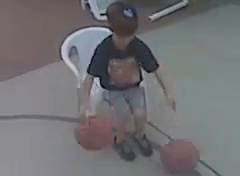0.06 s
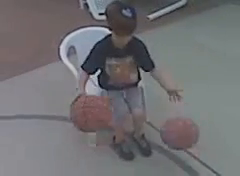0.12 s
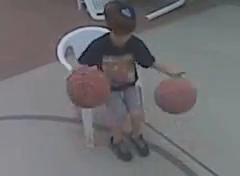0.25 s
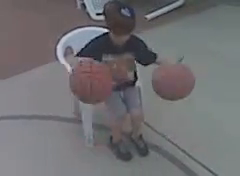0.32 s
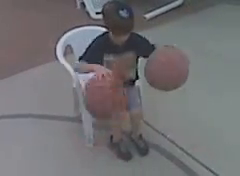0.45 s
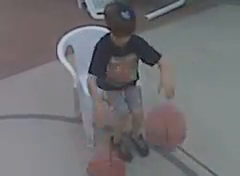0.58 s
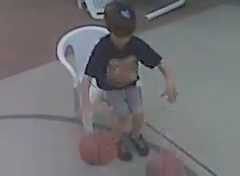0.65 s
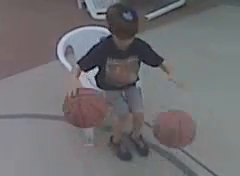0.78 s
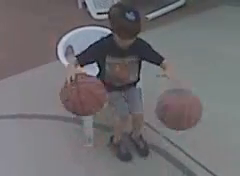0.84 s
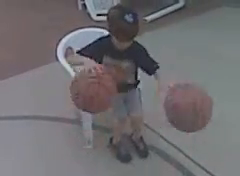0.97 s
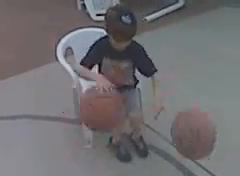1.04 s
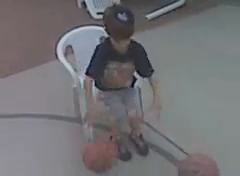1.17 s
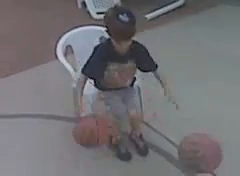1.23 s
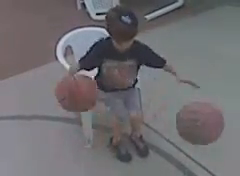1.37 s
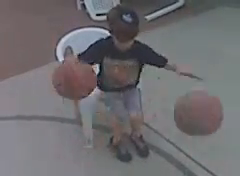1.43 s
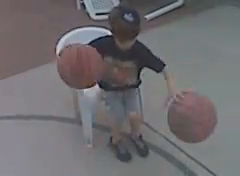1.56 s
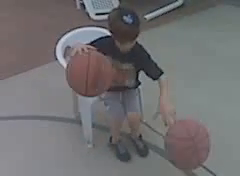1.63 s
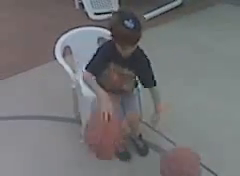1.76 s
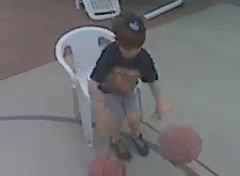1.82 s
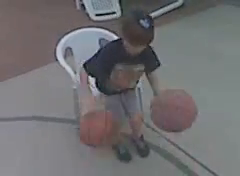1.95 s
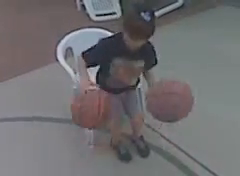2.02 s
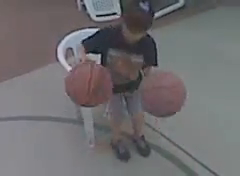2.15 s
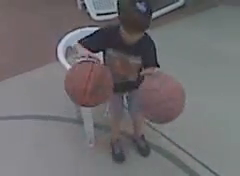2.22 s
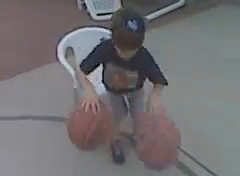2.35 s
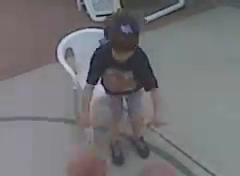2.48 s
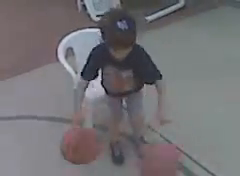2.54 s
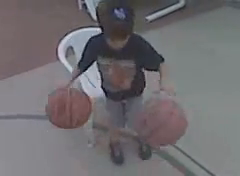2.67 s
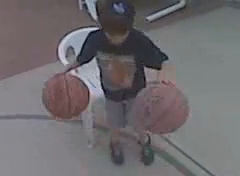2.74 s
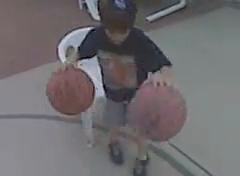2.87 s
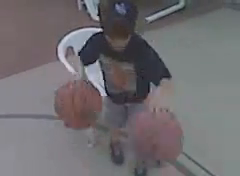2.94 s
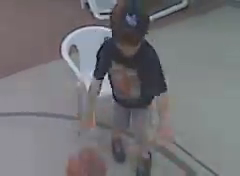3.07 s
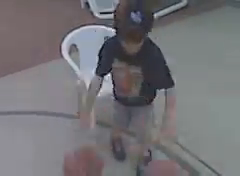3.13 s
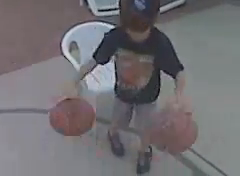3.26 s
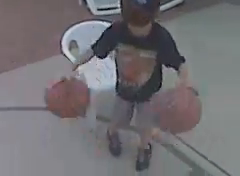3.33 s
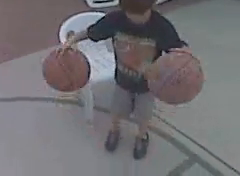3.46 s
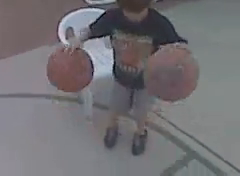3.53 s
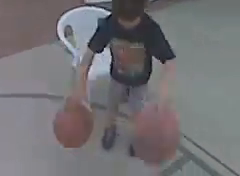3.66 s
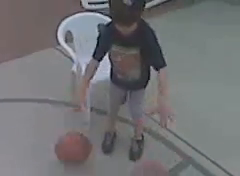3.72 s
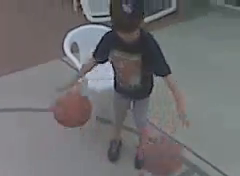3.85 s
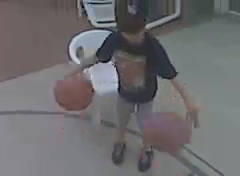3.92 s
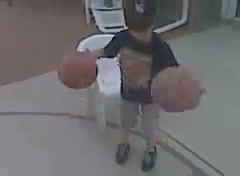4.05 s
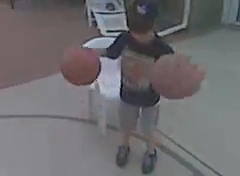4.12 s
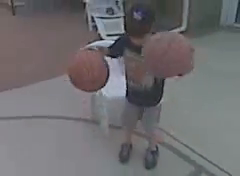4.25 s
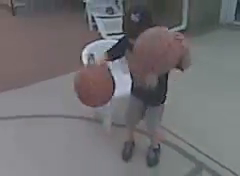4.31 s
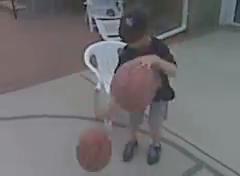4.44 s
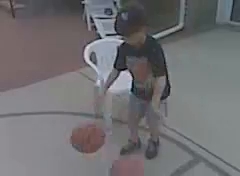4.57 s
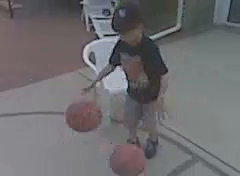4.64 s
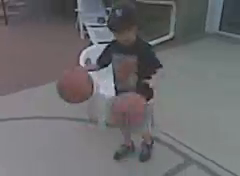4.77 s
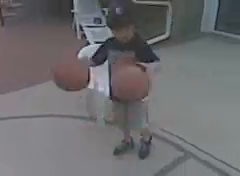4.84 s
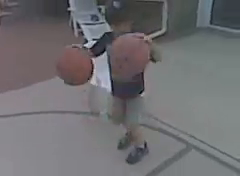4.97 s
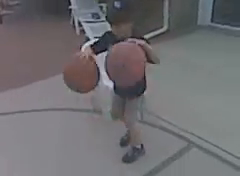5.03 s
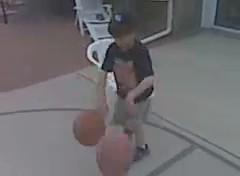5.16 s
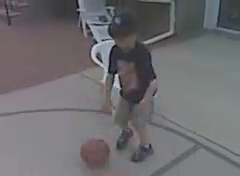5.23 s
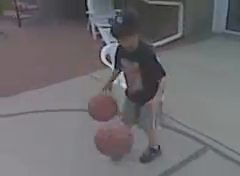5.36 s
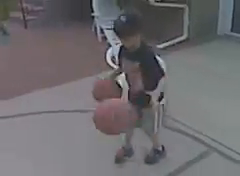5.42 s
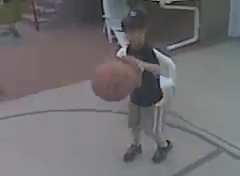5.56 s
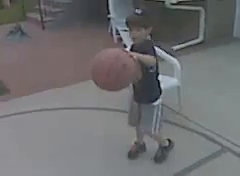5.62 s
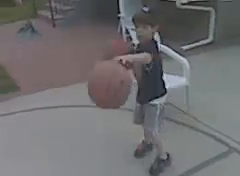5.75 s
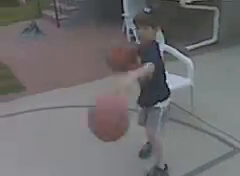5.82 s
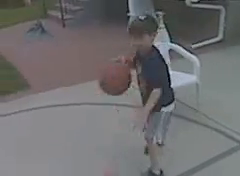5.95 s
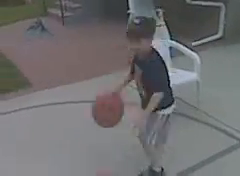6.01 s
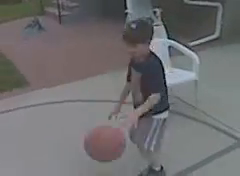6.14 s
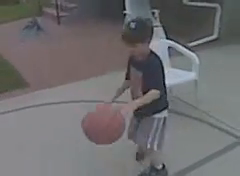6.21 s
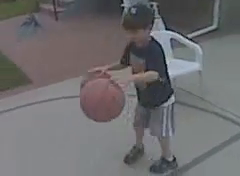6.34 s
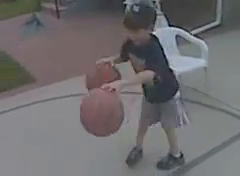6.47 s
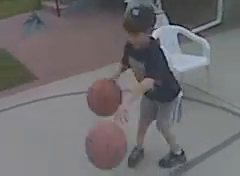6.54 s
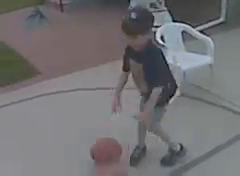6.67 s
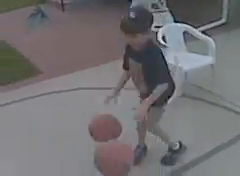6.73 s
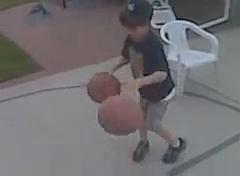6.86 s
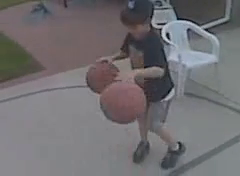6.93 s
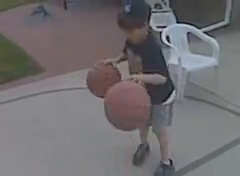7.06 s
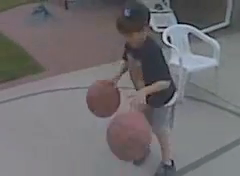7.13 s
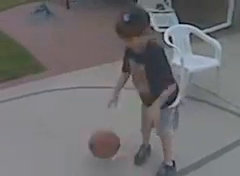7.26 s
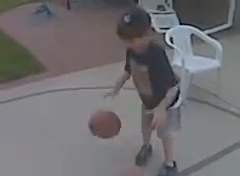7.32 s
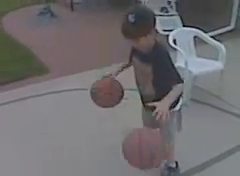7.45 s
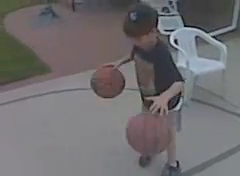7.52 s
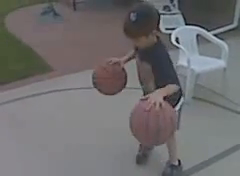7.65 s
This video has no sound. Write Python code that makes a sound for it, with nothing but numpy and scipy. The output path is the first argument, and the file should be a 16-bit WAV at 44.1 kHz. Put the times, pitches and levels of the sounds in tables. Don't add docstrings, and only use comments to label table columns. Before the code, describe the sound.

A steady pair of bouncing rubber balls smacks a hard yard floor, the two hits tightly bunched or slightly split. Later the gaps widen to about 0.7 seconds and shoes scrape and hands pat more noticeably before the rhythm settles again. Walls throw back clattery echoes; small birds whistle far off in soft outdoor hiss. Boxy, low-fidelity mono sound with clipped peaks and no high treble.

```python
import sys
import numpy as np
from scipy import signal
from scipy.fft import rfft, irfft, next_fast_len
from scipy.io import wavfile
from scipy.ndimage import uniform_filter1d

SR = 44100
rng = np.random.default_rng(int(sys.argv[2]) if len(sys.argv) > 2 else 0)


def int16_out(signal):
    q = np.round(np.clip(np.atleast_2d(signal).T, -1, 1) * 32767)
    wavfile.write(sys.argv[1], SR, q.astype(np.int16))


def boost_factor(decibels):
    exponent = np.asarray(decibels, float) / 20
    return 10 ** exponent


N = 339129
LEAD = 0.004

# f/Hz, level/dB per Hz
SLAP_COLOUR = [(100, -28.5), (300, -19.5), (750, -16.5), (1200, -0.5), (2100, -5.5), (2400, -18.5),
               (2800, -9.5), (3400, -7.5), (3900, -1), (4700, -6), (5600, -61.5)]
# f/Hz, level/dB per Hz
GRIT_COLOUR = [(100, -42.5), (300, -24.5), (1000, -13.5), (1800, -4.5), (2700, 0), (4700, -9.5),
               (5600, -60.5)]


def read(points, hz):
    f, value = np.transpose(points)
    return np.interp(np.log(hz + 1), np.log(f + 1), value)


def evened(x):
    return x / np.sqrt(np.mean(x ** 2) + 1e-20)


def smooth(x, size):
    return uniform_filter1d(uniform_filter1d(x, size=size), size=size)


def drifting_patches(x, bands, frames):
    return evened(uniform_filter1d(uniform_filter1d(x, size=bands, axis=0), size=frames, axis=1))


def add(mix, s, sound):
    part = mix[max(round(s * SR), 0):][:len(sound)]
    part += sound[:len(part)]


def colour(x, points):
    size = next_fast_len(len(x) + 2048)
    response = boost_factor(read(points, np.fft.rfftfreq(size, 1 / SR)))
    return irfft(rfft(x, size) * response, size)[:len(x)]


def ring(x, hz, width_hz):
    r = np.exp(-np.pi * width_hz / SR)
    pole = r * np.exp(2j * np.pi * hz / SR)
    return 2 * signal.lfilter([(1 - r) ** 2], [1, -2 * pole, pole ** 2], x).real


def hiss():
    # f/Hz, level/dB per Hz
    air_colour = [(18, -71), (30, -44), (80, -14.5), (151, -4.5), (203, -21.5), (243, -5), (441, -4),
                  (572, -8), (631, -4), (755, -5), (2930, 0), (3500, -5.5), (4550, -33), (7700, -120)]
    frames, hz = N // 128 + 6, np.fft.rfftfreq(512, 1 / SR)
    a, b, patches = rng.standard_normal((frames, 257, 3)).T
    patches = drifting_patches(patches, 5, 24)
    swell = evened(smooth(rng.standard_normal(frames), 100))
    level_db = read(air_colour[:-2], hz)[:, None] + 2.7 * patches + 1.27 * swell
    z = (a + 1j * b) * boost_factor(level_db) * (hz < 6000)[:, None]
    wash = signal.istft(z, nperseg=512, noverlap=384)[1][:N]
    return boost_factor(-44) * evened(wash)


def slap(db, hz, rise_ms, ring_ms, width_hz, plain, body, tint, crack):
    # f/Hz, width/Hz, level/dB
    air_modes = [(514, 210, -4), (926, 140, -10.5), (1400, 430, 5.5), (2080, 57, 1), (2630, 820, 3.5),
                 (3250, 500, -6.5)]
    t = np.arange(1800) / SR - LEAD
    shape = np.where(t < 0, np.exp(t * 1e3 / rise_ms), boost_factor(-60e3 * t / ring_ms))
    puff = rng.standard_normal(len(t)) * shape
    puff = puff + crack * rng.choice([-1, 1]) * (np.arange(len(t)) == np.argmin(abs(t)))
    modes = np.zeros(len(t))
    for f, width, mode_db in air_modes:
        gain = boost_factor(mode_db + 10.0 * rng.standard_normal())
        modes += gain * ring(puff, f * rng.uniform(0.94, 1.05), 1.6 * width)
    smack = plain * evened(colour(puff, tint))
    sound = smack + evened(ring(puff, hz, width_hz)) + body * evened(modes)
    return boost_factor(db) * sound / abs(sound).max()


def yard(db, tint):
    # f/Hz, t60/s
    decay_times = [(100, 0.45), (300, .38), (800, 0.25), (2000, 0.42), (3500, 0.48)]
    count = SR * 3 // 5
    clumps_db = 2.0 * evened(uniform_filter1d(rng.standard_normal(count), size=90))
    taps = rng.standard_normal(count) * boost_factor(clumps_db)
    sharp = rng.random(count) < 150 / SR
    taps = taps + 7.6 * rng.standard_normal(count) * sharp
    hz, t, z = signal.stft(taps, SR, nperseg=512)
    patches = drifting_patches(rng.standard_normal(z.shape), 3, 6)
    z = z * boost_factor(read(tint, hz)[:, None] + 3.9 * patches)
    quick = boost_factor(-60 * t / read(decay_times, hz)[:, None])
    faint = boost_factor(-24.0 - 60 * t / 0.9)
    tail = signal.istft(z * (quick + faint), SR, nperseg=512)[1][:count]
    fade_in = np.minimum(np.arange(count) / SR / 0.0054, 1)
    return boost_factor(db) * tail / tail[:2000].std() * fade_in


def walls(hz, house_ms, house_db, fence_db, far_db):
    fence_hz, edge_hz, edge_db, far_ms = 2150, 2650, -8, 56.2
    return [(20.6, fence_db, fence_hz),
            (house_ms - 4.0, house_db + edge_db, edge_hz),
            (house_ms, house_db, np.sqrt(hz * fence_hz)),
            (house_ms + 3.6, house_db + edge_db, hz),
            (far_ms, far_db, 2230),
            (far_ms + house_ms, far_db - 10, edge_hz)]


def bounces():
    # t/s, slap peak level/dB, slap colour f/Hz, near echo level/dB, yard level/dB (both against the slap)
    landings = [(0.0365, -10.5, 1630, 6, 6), (0.1209, -7.5, 2590, -7.5, -2), (0.6592, -6, 2020, 3.5, 4.5),
                (0.7272, -2.5, 1740, 7.5, 0.5), (1.2188, -2.5, 1880, -5.5, -0.5),
                (1.225, 4.5, 2300, 1.9, -5), (1.79, -13.5, 2050, -9, 9), (1.9026, -6, 1830, -2, 4.5),
                (2.5203, -3, 2080, 5, -6.5), (2.5269, 1.5, 2270, 5, -2), (3.155, -3, 1300, 4.5, 4.5),
                (3.1677, -2, 2340, 3, -4), (3.7802, -7, 2020, 1.5, 3), (3.8209, -2.5, 1444, 1.5, 1.5),
                (4.564, -3.5, 2490, 1, 2.5), (4.6648, -6.5, 3620, 4, 7), (5.2947, 0.35, 3270, -2, 0.5),
                (6.056, -13.5, 1960, 7, 6.5), (6.1694, -5.5, 1700, 2, 6), (6.7117, -10.5, 3250, 0.5, 8),
                (6.7304, -5.5, 2150, 0, 3.5), (7.3071, -9.5, 3100, 8.5, 3), (7.3326, -4.5, 2720, -2.5, 1.5)]
    # way to the house wall and back t/ms, then house, side fence, far wall level/dB against the slap
    places = [(32.2, 3, -3, -7.5), (30, -1.5, -7, -10.5), (30.3, 1.5, 3, -10), (34.3, -1, -9.5, -6),
              (27.55, -5, -3.5, -8.5), (33.5, -10.5, -16, -18.5), (33, -7.5, 4.5, -1.5),
              (32.8, 2.5, -3.3, -6), (32.2, -2.5, -16.5, -13.5), (34.6, -14, -6, -17.5),
              (32.2, -4.5, -16, -12), (34.7, -7, -6.5, -10.5), (27.6, 3.5, -4, -10.5), (35, -6, -12.5, -10),
              (30, 0.5, -31, -1.5), (32, -3.2, -18, -4.5), (30, -5, -16, -17.5), (28.4, 6.5, -11, 1),
              (29.06, 4.5, -12, -7.5), (27.5, 3, -12, -13.5), (28.4, 1.8, -15, -12.5),
              (33.4, 3.3, -20.5, -10.5), (36.4, -7, -15, -13)]
    # delay t/ms, level/dB
    near_surfaces = [
        (4.5, -6),
        (9.5, -7.5),
        (14, -14.5),
    ]
    # f/Hz, level/dB per Hz
    yard_colour = [(40, -17), (150, -16.5), (270, -11.5), (700, -7), (1300, -3), (2100, -4), (2400, -5),
                   (2800, -3), (3400, -10.5), (4500, -11.5)]
    out = np.zeros(N)
    for (s, db, hz, echo_db, yard_db), place in zip(landings, places):
        start = s - LEAD
        touch = slap(db - 19, hz, 0.3, 26, 706, 0.8, 0.37, SLAP_COLOUR, 2.0)
        add(out, start - 0.0015, touch)
        main = slap(db + 1.0, hz, 0.5, 17.2, 550, 0.8, 1.0, SLAP_COLOUR, 3.0)
        add(out, start + 0.0008, main)
        for ms, near_db in near_surfaces:
            near_hz = hz * rng.uniform(0.88, 0.98)
            echo = slap(db + near_db + echo_db, near_hz, 0.9, 22, 500, 1.0, 1.0, SLAP_COLOUR, 11.5)
            add(out, start + ms / 1e3, echo)
        add(out, s, yard(db + yard_db - 15.5, yard_colour))
        for ms, wall_db, wall_hz in walls(hz, *place):
            echo = slap(db + wall_db, wall_hz, 0.5, 10.5, 650, 0.56, 0.45, SLAP_COLOUR, 8.0)
            add(out, start + ms / 1e3, echo)
    return out


def thump(db, hz, t60, swell_ms):
    t = np.arange(SR // 8) / SR
    shape = (1 - np.exp(-t * 1e3 / swell_ms)) ** 2 * boost_factor(-60 * t / t60)
    return boost_factor(db) * shape / shape.max() * np.sin(2 * np.pi * (hz * t + rng.random()))


def hum(db, hz, width_hz, t60):
    t = np.arange(SR // 2) / SR
    tone = evened(ring(rng.standard_normal(len(t)), hz, width_hz))
    return boost_factor(db - 60 * t / t60) * tone * np.minimum(t / 0.0087, 1)


def thumps():
    # t/s, peak level/dB, f/Hz, lingering hum
    # level/dB against the thump
    rebounds = [(0.038, -25, 282, -20), (0.127, -22.5, 257, -13.5), (0.656, -19.5, 273, -17.5),
                (0.728, -13.5, 247, -18), (1.219, -14.5, 338, -21.5), (1.228, -16, 242, -17),
                (1.796, -30, 279, -21), (1.903, -18.5, 287, -19.5), (2.519, -19.5, 335, -12),
                (2.53, -14.5, 266, -20), (3.155, -19.5, 253, -20), (3.169, -17.5, 280, -32.5),
                (3.779, -25.5, 281, -17), (3.824, -15.5, 277, -19), (4.566, -30, 241, -19),
                (4.587, -25.5, 315, -14.5), (4.668, -17, 284, -21), (5.298, -6.5, 258, -26),
                (6.057, -17.5, 255, -15.5), (6.173, -23, 249, -15), (6.195, -28, 302, -5),
                (6.713, -23.5, 246, -13.5), (6.73, -23, 200, -12), (7.307, -28, 264, -25),
                (7.344, -10.5, 273, -21.5)]
    out = np.zeros(N)
    for s, db, hz, hum_db in rebounds:
        add(out, s, thump(db - 2.0, hz, 0.036, 3.5))
        add(out, s, thump(db - 14.5, 150, 0.036, 4.6))
        add(out, s, thump(db - 8.5, 440, 0.027, 1.5))
        add(out, s, hum(db + hum_db, 283, 90, 0.48))
    return out


def pats():
    # t/s, peak level/dB, colour f/Hz, ring t/ms
    contacts = [(0.3743, -25.5, 2470, 10), (2.2697, -23.5, 2560, 25), (2.359, -30, 1350, 63),
                (2.94, -17, 2920, 8.4), (2.9668, -21.5, 1930, 16), (3.5046, -20.5, 3220, 39),
                (3.5214, -16, 2270, 59), (4.15, -27.5, 2800, 24), (4.2017, -26.5, 2600, 23),
                (4.338, -30.5, 2260, 21), (4.356, -29.5, 2180, 19), (4.472, -31, 2010, 13),
                (4.894, -38.5, 2810, 40), (5.0278, -24.5, 2640, 16), (5.0597, -16, 2570, 8.9),
                (5.067, -10, 3400, 17), (5.1764, -30, 3250, 20.0), (5.252, -40, 2800, 24),
                (5.414, -13, 1960, 41), (5.459, -12.5, 2670, 26), (5.62, -45, 2560, 20.0),
                (5.8033, -31, 2700, 14), (6.4865, -30, 2080, 19.8), (7.123, -26, 2680, 82)]
    out = np.zeros(N)
    for s, db, hz, ring_ms in contacts:
        add(out, s - 0.003, slap(db - 0.6, hz, 1.0, ring_ms, 600, 1.0, 0.24, GRIT_COLOUR, 6.0))
        add(out, s, yard(db - 23, GRIT_COLOUR))
    return out


def whistles():
    # start t/s, length t/s, first f/Hz, last f/Hz, level/dB
    bird_notes = [(0.487, 0.048, 2090, 2103, -48), (1.441, 0.088, 2115, 2130, -46),
                  (2.372, .065, 3520, 2960, -42), (2.736, .065, 3550, 2550, -39.5),
                  (2.853, .065, 2780, 2470, -41), (3.364, .095, 2800, 2790, -35),
                  (3.64, 0.076, 2610, 2440, -43), (3.95, .18, 2690, 2760, -41.5),
                  (4.461, 0.093, 2100, 2140, -52), (4.863, 0.058, 2770, 2790, -44),
                  (4.924, .1, 2810, 2810, -44), (5.828, 0.16, 2740, 2920, -44),
                  (7.017, 0.034, 2840, 2920, -46), (7.523, .06, 2950, 2950, -44),
                  (7.589, 0.094, 2230, 2420, -45), (7.655, .06, 2480, 2540, -38.5)]
    out = np.zeros(N)
    for s, length, first_hz, last_hz, db in bird_notes:
        u = np.arange(0, length, 1 / SR) / length
        a, b, waver = evened(smooth(rng.standard_normal((3, len(u))), 200))
        glide_hz = first_hz + (last_hz - first_hz) * np.sin(np.pi / 2 * u) ** 2
        turn = np.exp(2j * np.pi * np.cumsum(35 * waver + glide_hz) / SR)
        level = boost_factor(db + 2.0) * np.sin(np.pi * u ** 1.3) ** 0.8
        smear = 1.24 + 0.36 * (a + 1j * b)
        add(out, s, level * (turn * smear).real)
    return out


def cracks():
    # t/s, peak level/dB, colour f/Hz
    blows = [
        (0.7288, -1.8, 1785),
        (3.823, -1.6, 1927),
        (4.5672, -1.6, 2460),
        (6.1985, 0.3, 1535),
        (6.733, -.9, 2160),
    ]
    out = np.zeros(N)
    for s, db, hz in blows:
        add(out, s - LEAD, slap(db, hz, 0.5, 6, 1200, 0.5, 0.2, SLAP_COLOUR, 20))
    return out


def cupped_pats():
    # t/s, peak level/dB, f/Hz
    cups = [
        (2.145, -41, 474),
        (2.362, -39, 481),
        (3.371, -42.5, 352),
        (4.117, -44.5, 266),
        (4.856, -42.5, 285),
        (4.914, -39.5, 438),
    ]
    out = np.zeros(N)
    for s, db, hz in cups:
        add(out, s, thump(db, hz, 0.04, 3.7))
    return out


def scuffs():
    # hardest push t/s, build-up t/s, letting go t/s, level/dB
    drags = [(2.942, .012, .08, -33.5), (3.541, .006, 0.023, -44), (3.97, .09, 0.23, -41),
             (4.145, .03, 0.014, -37), (4.195, .06, 0.013, -42.5), (4.55, .1, .008, -36.5),
             (5.035, .012, 0.065, -29.5), (5.066, .03, 0.081, -25.5), (5.42, .025, 0.062, -27),
             (5.458, .06, .04, -27.5), (6.146, .08, 0.035, -28.5), (6.7, 0.034, 0.013, -33.5)]
    out = np.zeros(N)
    for s, rise, fall, db in drags:
        t = np.arange(-rise, fall, 1 / SR)
        clicks = rng.standard_normal(len(t)) * boost_factor(1.4 * rng.exponential(1, len(t)))
        grit = clicks * (rng.random(len(t)) < 7000 / SR)
        push_db = db - 21 * np.where(t < 0, -t / rise, t / fall) ** 1.4
        rub = evened(colour(grit, GRIT_COLOUR)) * signal.windows.tukey(len(t), 0.1)
        add(out, s - rise, boost_factor(push_db) * rub)
    return out


def scene():
    ball_sounds = bounces() + thumps() + cracks()
    hands_and_feet = pats() + cupped_pats() + scuffs()
    return (hiss() + ball_sounds + hands_and_feet + whistles())[None]


def top_cut(x):
    return signal.sosfilt(signal.butter(12, 16500, fs=SR, output="sos"), x)


def record(dry):
    # f/Hz, level/dB
    band_response = [(25, -13), (70, 0), (1700, -2.5), (2100, 0.5), (2400, -1.5), (2750, 0.5), (3100, -0.5),
                     (3450, 0.5), (3650, -8), (3900, -16), (4200, -23.5), (4600, -42), (5200, -86.5)]
    overload = 0.71
    narrow = colour(dry[0], band_response)[None]
    return top_cut(np.clip(narrow, -overload, overload))


dry = scene()
out = record(dry)
int16_out(out)
```